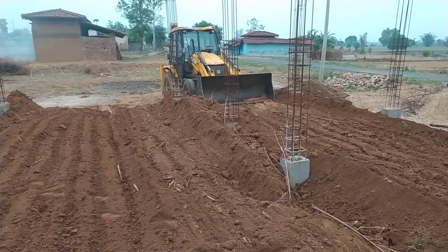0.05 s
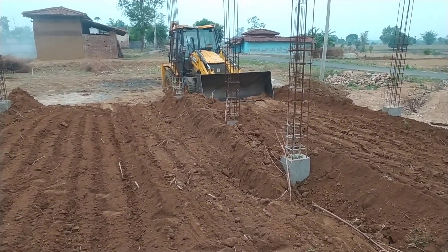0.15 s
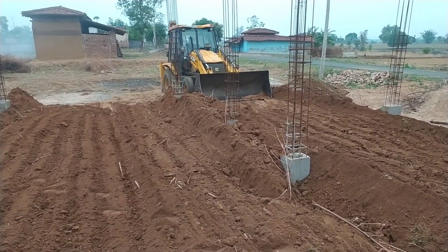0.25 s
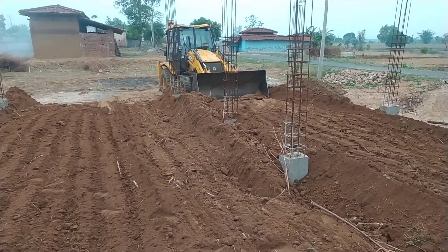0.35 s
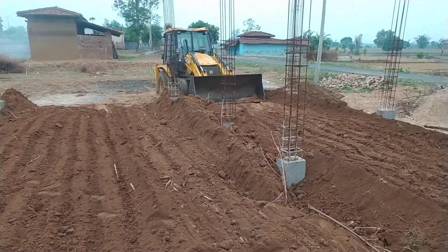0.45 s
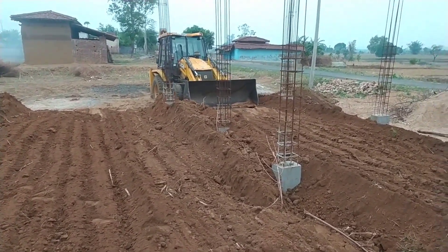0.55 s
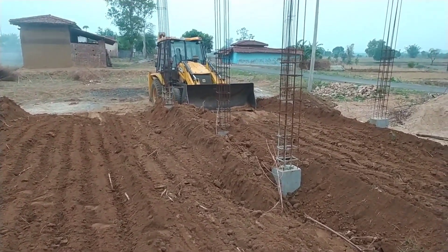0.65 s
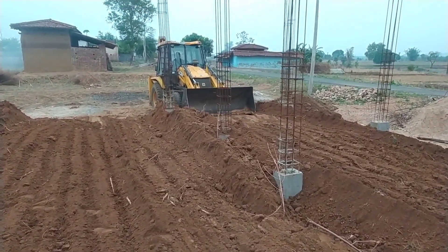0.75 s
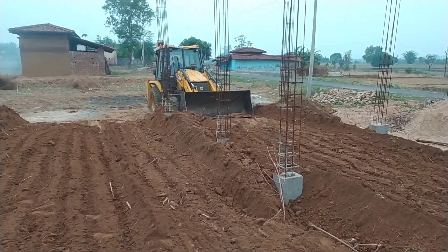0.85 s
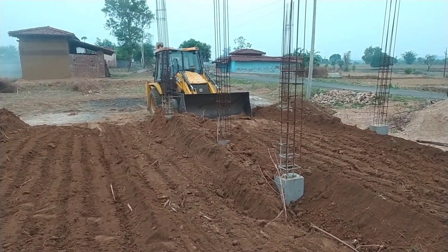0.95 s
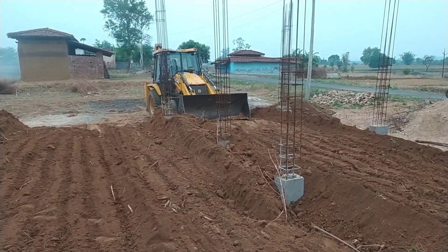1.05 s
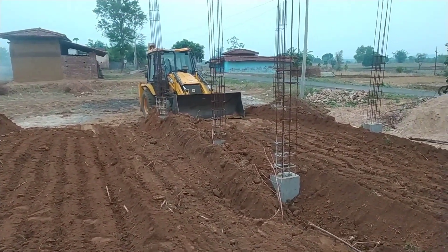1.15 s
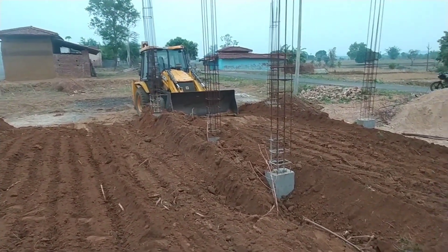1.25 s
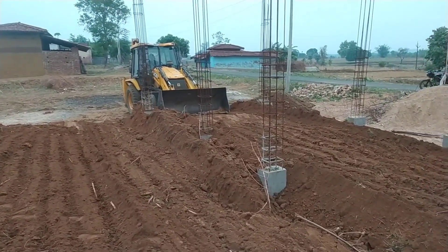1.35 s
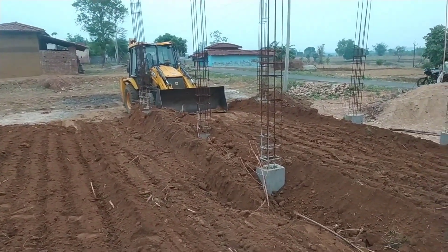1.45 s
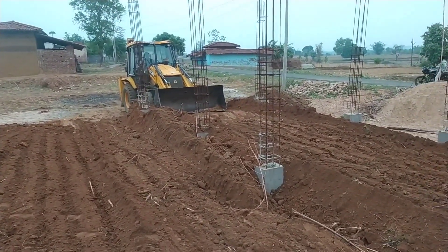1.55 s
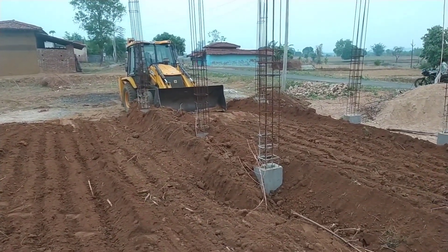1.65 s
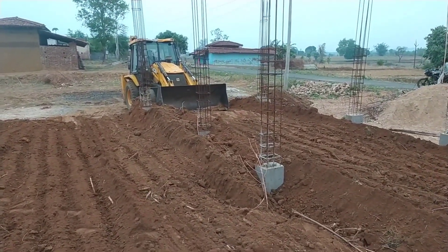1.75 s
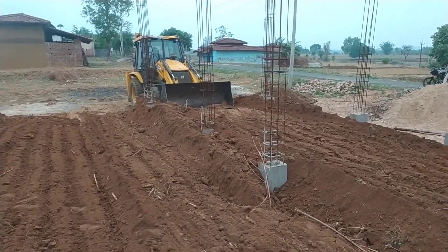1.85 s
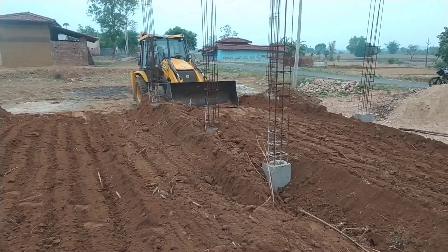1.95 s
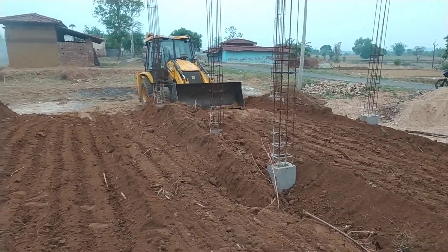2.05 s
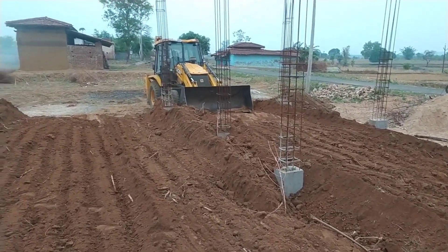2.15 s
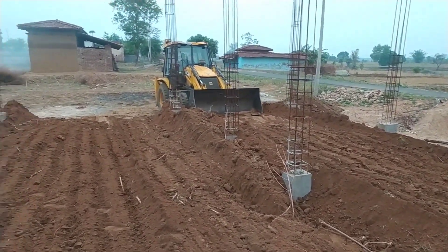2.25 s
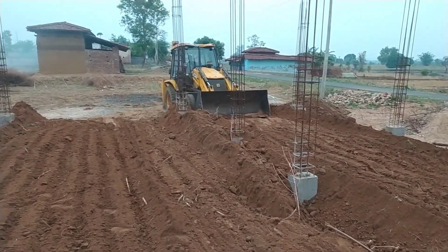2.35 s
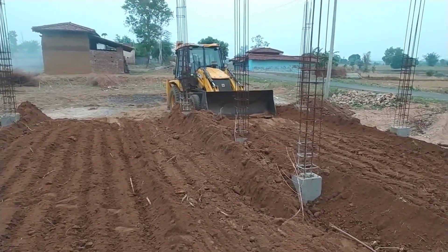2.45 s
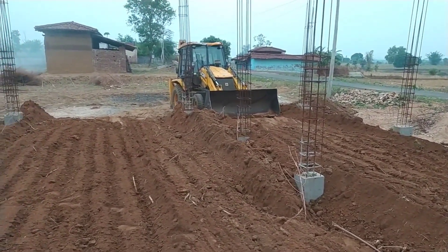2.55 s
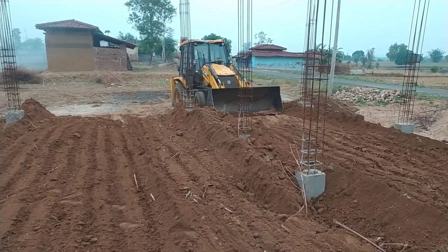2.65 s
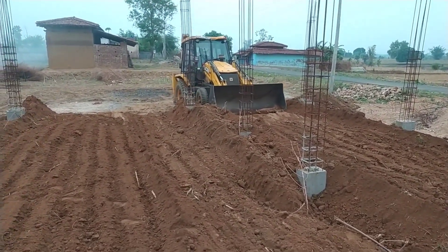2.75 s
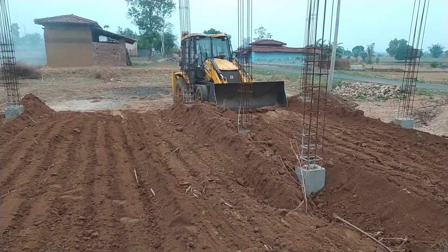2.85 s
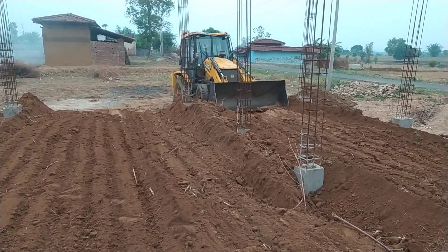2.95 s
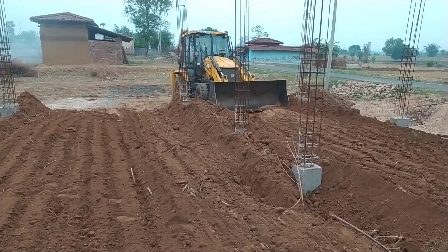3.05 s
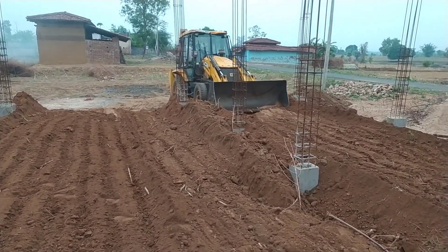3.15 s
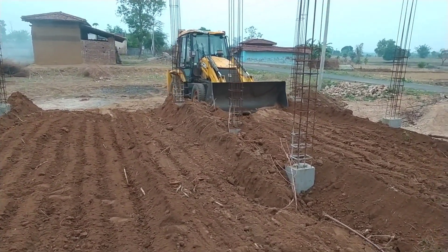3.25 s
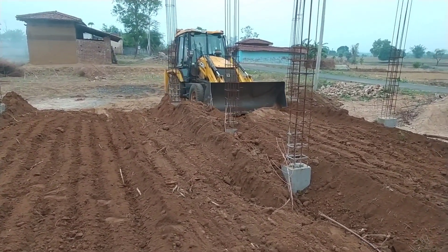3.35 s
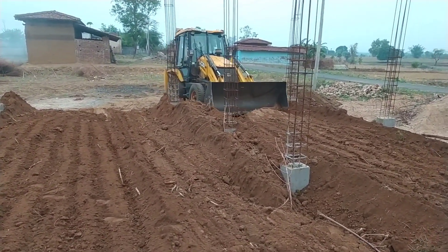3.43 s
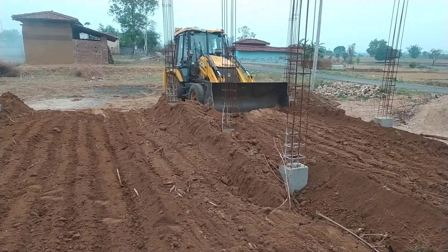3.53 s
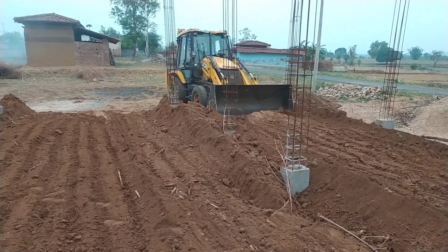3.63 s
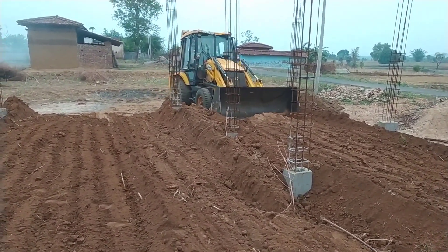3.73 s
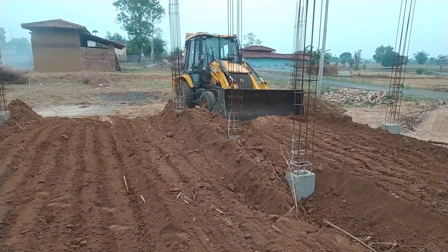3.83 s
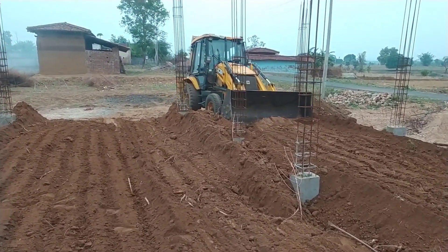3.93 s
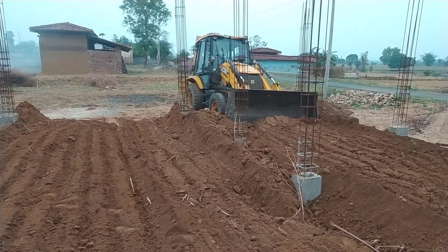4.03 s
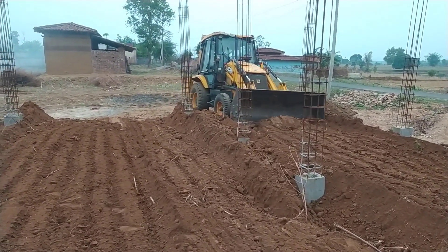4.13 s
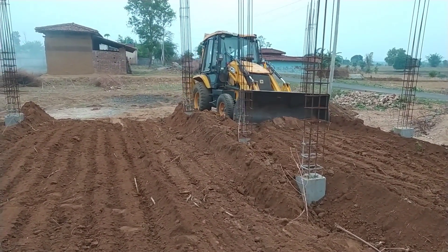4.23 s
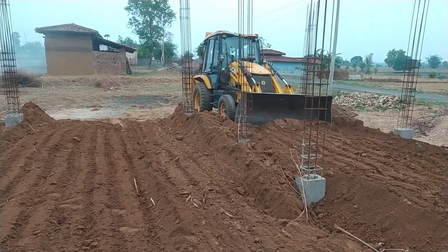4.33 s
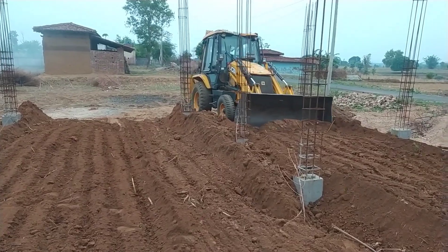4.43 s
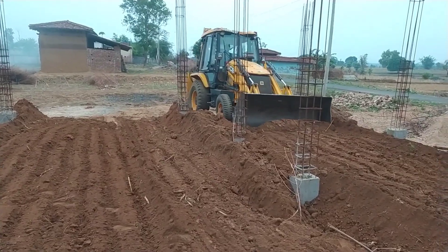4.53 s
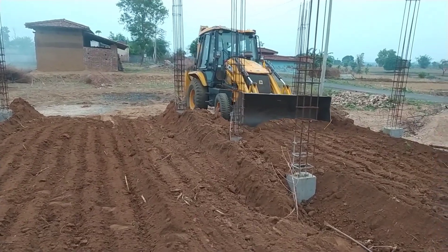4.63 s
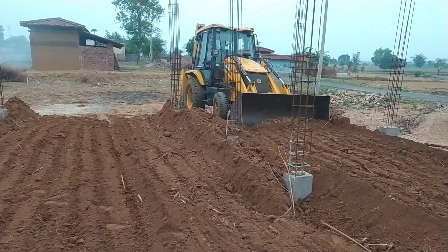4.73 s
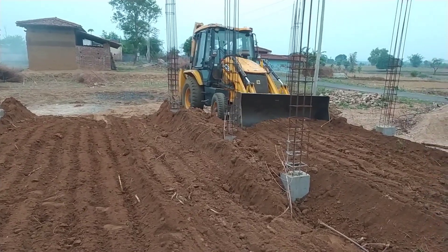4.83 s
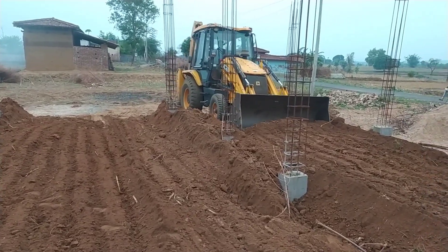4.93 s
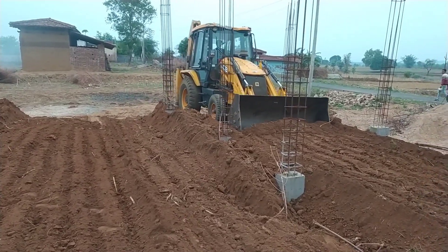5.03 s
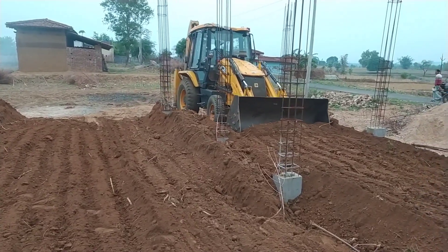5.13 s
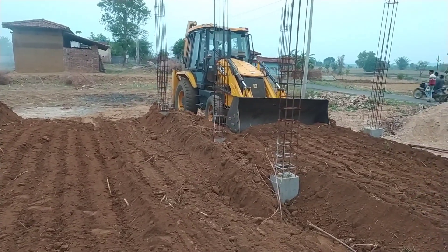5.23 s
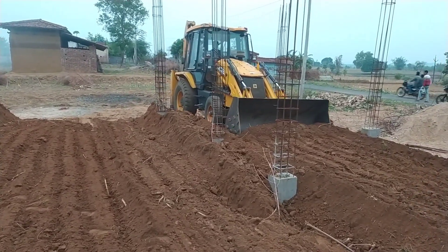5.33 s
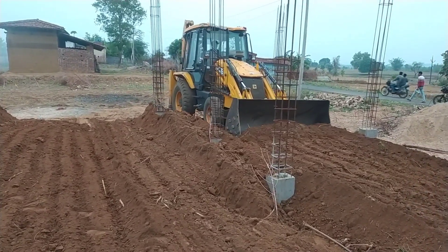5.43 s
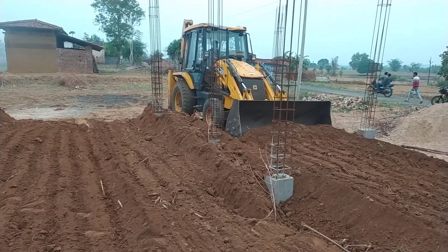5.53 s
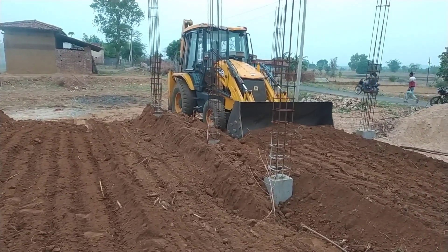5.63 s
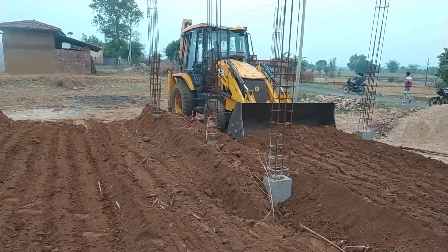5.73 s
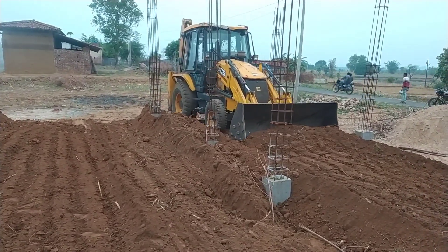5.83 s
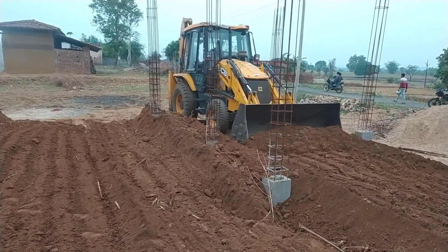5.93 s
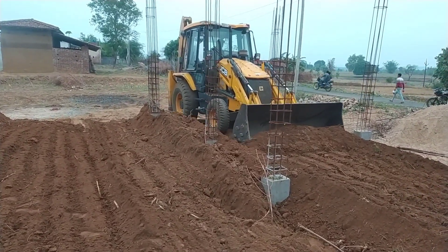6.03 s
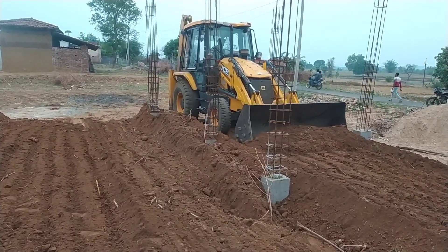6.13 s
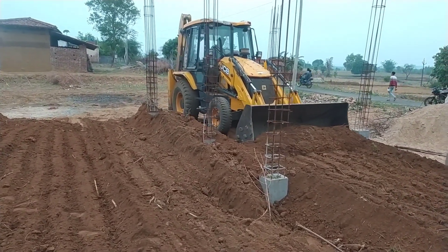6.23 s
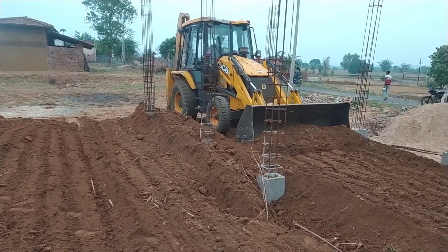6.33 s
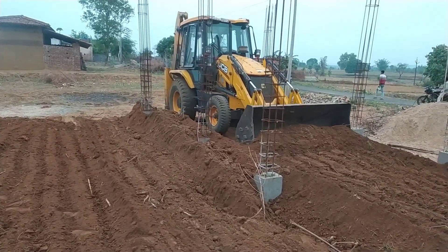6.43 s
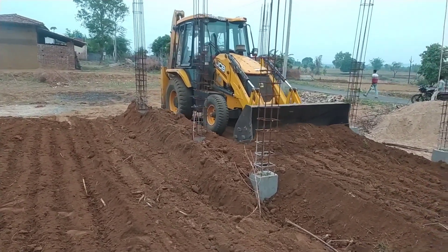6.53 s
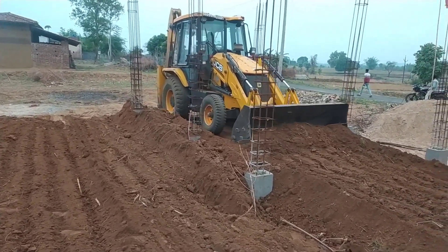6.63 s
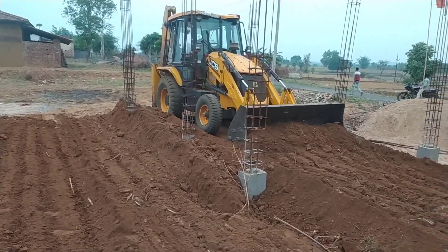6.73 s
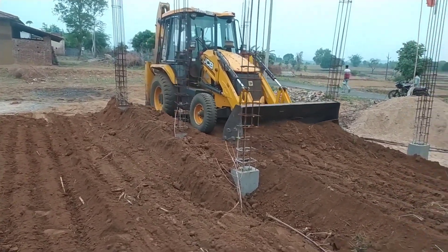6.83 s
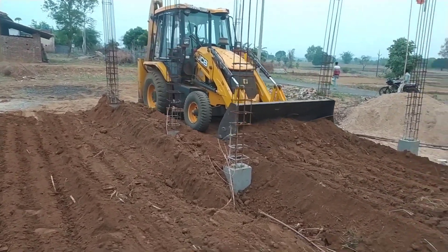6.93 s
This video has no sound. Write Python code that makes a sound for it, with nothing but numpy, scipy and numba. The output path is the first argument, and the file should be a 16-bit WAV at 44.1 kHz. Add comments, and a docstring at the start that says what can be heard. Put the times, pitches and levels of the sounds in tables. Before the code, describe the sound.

From 0 to 1.8 seconds a four-cylinder diesel loader idles some distance away: a low, rapid throb near 39 pulses per second, with grainy exhaust burble, soft block clatter and a dull fan roar. Small dry ticks occur around 0.3, 1.2 and 1.6 seconds. The pitch sags slightly at 1.25 and 1.8, then surges from 1.85 to 2.4 with a burst of hiss, settling near 55 pulses per second. The fuller, harder drone then holds, growing gradually louder and closer until the end at 7 seconds, with irregular hollow exhaust pops. A short bucket clank falls at 3.3; clustered clanks and thin scraping rattles come between 4.6 and 5.0. The note dips briefly at 5.1 and recovers, with small higher clanks near 5.7 to 5.85. Open outdoor space, small stereo microphone, dominated by the engine.

```python
"""A low engine throb idles, climbs in pitch and grows louder as a four-cylinder diesel loader draws near.
The throb is a sum of multiples of the firing rate; noise puffs and decaying modes ring its exhaust pipe.
The block clatters and the gas hisses as noise swelling once a firing; a bucket ticks, clanks and rattles.
Behind lies the roar of fan, intake and tyres. Two microphone ports share the bass but differ above it."""
import sys
import numpy as np
from scipy import signal
from scipy.fft import rfft, irfft
from scipy.io import wavfile
from scipy.ndimage import uniform_filter1d
from numba import njit

SR = 44100
rng = np.random.default_rng(int(sys.argv[2]) if len(sys.argv) > 2 else 0)


def unload_wav(signal):
    """Save mono or channel-first audio to the path in sys.argv[1] as 16-bit WAV at rate SR, clipped to [-1, 1]."""
    wavfile.write(
        sys.argv[1],
        SR,
        np.round(np.clip(np.atleast_2d(signal).T, -1, 1) * 32767).astype(np.int16),
    )


N = 307818
BIN_HZ = np.arange(N // 2 + 1) * SR / N

# firing rate of the engine: (time [s], rate [Hz])
FIRING_RATE = [(0.0, 39.83), (0.9, 39.55), (1.25, 38.21), (1.7, 38.97), (1.82, 37.36), (1.95, 43.13),
               (2.22, 49.41), (2.42, 55.72), (3.6, 55.39), (4.2, 55.48), (4.5, 54.82), (4.72, 55.52),
               (5.13, 52.47), (5.4, 55.78), (5.8, 57.21), (6.25, 56.85), (6.5, 56.26), (6.98, 56.99)]
# engine effort, peaking as the revs climb and as the bucket bites: (time [s], effort [0-1])
EFFORT = [(0, 0.23), (.55, 0.35), (1.0, 0.17), (1.79, 0.09), (1.87, 0.78), (2.1, 0.43), (2.28, 0.96),
          (2.45, 0.53), (2.7, 0.47), (4.1, 0.4), (4.75, 0.57), (5.1, 0.45), (6.98, 0.31)]
IDLE_HZ, FULL_HZ = 39, 56  # firing rates at idle and at full revs
CLIMB_HZ_PER_S = 25  # a rise in firing rate that counts as a full climb
START_M, SETS_OFF_S, SPEED_M_S = 35.3, 2.35, 3.15  # distance, departure and approach speed

# level laws of the engine's layers: (idle level at the start [dB], added at full revs [dB],
# added at full effort [dB], share of the 1 / distance gain [ratio])
TONE_LEVEL = (-41, 6.5, 4, 1.09)
PUFF_LEVEL = (-36.5, 6.5, 6.5, 1.38)
BRIGHTNESS = (-8.5, 3, 3, 0.05)  # applied to each resonance by its share
KNOCK_LEVEL = (-47, 3, 5, 1.28)
HISS_LEVEL = (-54, 3.5, 17, 1.78)
FAN_LEVEL = (-39.5, 5, 2.5, 1.24)

# harmonics against the firing tone: (time [s], second multiple [dB], third multiple [dB])
HARMONICS = [(0, -0.5, -1.5), (.8, -2, 0), (1.71, -2.5, -0.5), (2.3, -0.5, 0.5), (3.1, -7, -1.5),
             (4.0, -6.5, -2), (4.85, -8, 1), (5.0, -7, -5), (5.3, -7, -1.5), (5.7, -4, -6.5),
             (6.98, -8.5, -6)]
# weaker multiples: (multiple of the firing rate, level against the firing tone [dB], waver [dB])
WEAK_MULTIPLES = [(1.5, -16, 1), (2.5, -26.5, 7), (3.5, -15, 2.5), (4, -10.5, 2), (5, -21.5, 0)]
LEAD_RAD = 1.9  # phase advance at full revs for each multiple above the second

# pipe resonances: (cool centre [Hz], hot centre [Hz], width before a factor of 1.56 per stage [Hz],
# level [dB], share of brightness [0-1], steady flow [0-1], lag at full revs [firings], kick [0-1])
PIPE_MODES = [(426, 444, 87, -1, 0.29, 0.46, -0.1, 0.68), (903, 979.3, 151, -1, 1, 0.74, -0.0108, 0.42),
              (1296, 1278, 250, -6.5, 0.81, 0.9, -0.06, 0.17)]
# how hard the four cylinders ring each resonance, one row a resonance:
# (cylinder 1 [dB], cylinder 2 [dB], cylinder 3 [dB], cylinder 4 [dB])
CYLINDERS_IDLE = [(-2, 3, 0, 2.5), (1, -2, 4.5, -2.5), (2, 0, -1, -1)]
CYLINDERS_FULL = [(1, -2, 4.5, -2.5), (1, 0.5, 3.5, -2), (1.5, -1, 0, -0.5)]
IDLE_LAG, FIRING_JITTER = 0.14, 0.02  # extra lag at idle, and spread of the pipe's timing [firings]
# the hardest puffs, before onset and decay: (time [s], first resonance [dB], second resonance [dB])
HARD_PUFFS = [(0.414, -13.5, -34), (0.564, -15.5, -25), (1.255, -17.5, -32), (1.359, -21, -18.5),
              (1.458, -22, -21), (1.541, -19, -28), (1.666, -22, -21.5), (1.919, -17, -16),
              (2.038, -8.5, -21), (2.053, -38, -12), (2.1, -27, -12.5), (2.142, -8.5, -43),
              (2.224, -5.5, -13), (2.666, -12, -10), (2.879, -7.5, -9), (3.89, -4, -12), (4.087, -25, -7),
              (4.235, -12, -3), (4.307, -12, -6), (4.392, -6, -9), (4.828, -4.5, -3), (5.185, -4, -8),
              (5.244, -17, -8), (5.353, -7.5, -6), (5.425, -7.5, -7), (5.566, -4, -8), (5.658, -7.5, -14),
              (5.672, -9, -3), (5.778, -4.5, -4), (5.849, -5, -5), (5.975, -7.5, -9), (6.198, -5.5, -3),
              (6.336, -4, -10), (6.398, -3.5, -15), (6.464, -5.5, -10), (6.552, -2, -13),
              (6.622, -7.5, -3.5), (6.907, -5, -12)]
# decay of a hard puff: (first resonance t60 [s], second resonance t60 [s])
HARD_PUFF_T60 = [0.045, 0.03]
DROWN_SHARE, DROWN_S = 0.85, 0.02  # share of the gas noise a hard puff replaces, and for how long

# combustion knock spectrum: (frequency [Hz], relative level per Hz [dB])
KNOCK_SPECTRUM = [(1000, -26), (1700, 7.5), (1910, 0), (2200, 5.5), (2770, 2), (2990, 0.5), (4000, -18),
                  (5200, -33), (8800, -120)]
# gas hiss spectrum: (frequency [Hz], relative level per Hz [dB])
HISS_SPECTRUM = [(2120, -47), (3600, 6.5), (4090, -0.5), (4420, 7), (5420, 4), (5940, 7), (7460, 0.5),
                 (9390, -2.5), (15200, -38.5)]
# drive of the block: (cylinder 1 [dB], cylinder 2 [dB], cylinder 3 [dB], cylinder 4 [dB])
BLOCK_DRIVE = (-2, -1, 6, -1)

# bucket levels hold before decay and before the dulling of the top
# ticks and scrapes: (time [s], level [dB], centre [Hz], t60 [s], left minus right [dB], rebound delay [ms])
DRY_TICKS = [(0.2622, -18.5, 2500, 0.01, 11, 0.51), (0.331, -36, 3800, 0.03, 8, 0.26),
             (1.184, -29.5, 1680, 0.09, 0, 0.05), (1.2865, -32, 5600, 0.023, -1, 0.9),
             (1.484, -39, 8000, .02, -2, 0.12), (1.605, -40.5, 8000, 0.086, -1, 0.12),
             (1.638, -40, 5000, 0.022, 10, 0.2), (4.86, -29.5, 1870, 0.31, 0, 0.6)]
REBOUND = 0.55  # amplitude of a rebound against its tick
# clanks of the bucket's plates: (time [s], level [dB], pitch [Hz])
PLATE_CLANKS = [(0.079, -21, 1280), (1.606, -30, 9090), (1.608, -35, 7290), (3.274, -5, 1150),
                (4.612, -11, 1025), (4.672, -7.5, 980), (4.689, -13, 1020), (4.697, -11, 1090),
                (4.859, -11, 1530), (5.686, -14, 2250), (5.704, -16, 3030), (5.845, -14, 2970)]
CLANK_CYCLES = 57  # cycles in the t60 of a clank
# linkage rattles: (time [s], ring level [dB], scrape level [dB], scrape t60 [s], part struck [0 or 1])
LINKAGE_RATTLES = [(4.645, -29, -33, .05, 1), (4.787, -32, -31.5, 0.34, 0), (4.797, -32, -33, 0.089, 0),
                   (4.856, -24, -43, .08, 1), (4.915, -18, -31, 0.095, 1), (4.959, -38, -33, .04, 1)]
# modes of the two linkage parts: (frequency [Hz], level [dB], t60 [s])
LINKAGE_MODES = [
    [(3830, -5, 0.11), (5230, 0, 0.053), (6815, -2, .12), (9680, -10, 0.12)],
    [(5400, -6, 0.05), (8660, -9, 0.11)],
]
SCRAPE_HZ, SCRAPE_PAN_DB = 5900, 3  # centre, and left minus right

# fan, intake and tyre spectrum: (frequency [Hz], relative level per Hz [dB])
ROAR_SPECTRUM = [(22, -25), (45, -8), (90, -8.5), (200, 0), (320, -8), (550, -6.5), (720, -13.5),
                 (1200, -11.5), (2000, -19), (4000, -44)]

# correlation of noise between the two ports: (frequency [Hz], correlation [0-1])
PORT_CORRELATION = [(250, 0.99), (500, 1), (700, 0.5), (1000, 1), (1500, 0.9), (2000, 0.25), (4500, 0.86),
                    (8000, 0), (12000, 0.5)]
# port differences in the bass, where there are none:
# (frequency [Hz], left minus right [dB], left phase lag [rad])
BASS_PORTS = [(200, 0, 0)]
# port differences above it: (frequency [Hz], left minus right [dB], left phase lag [rad])
UPPER_PORTS = [(438, 3.5, -0.14), (700, 3, 1.9), (860, -0.5, 0.37), (1606, 6, 1.3), (2050, -0.5, 4),
               (4940, 0.5, 4.5), (7360, 2.5, 5.5), (9700, -17.5, 6.5), (10800, -14.5, 0.5),
               (14300, -3.5, -10.5)]
TOP_HZ = 15100  # edge of the final low-pass


def undb(db):
    """Level in decibels expressed as an amplitude ratio."""
    return 10 ** (np.asarray(db) / 20)


def unit(x):
    """Normalisation to an rms of 1."""
    return x / np.sqrt(np.mean(x ** 2))


def curves(table):
    """Linear interpolation of a time table's columns at every sample."""
    s, *columns = np.transpose(table)
    return [np.interp(np.arange(N) / SR, s, column) for column in columns]


def along(table):
    """Interpolation of a spectral table's columns over log frequency, at every bin."""
    hz, *columns = np.transpose(table)
    return np.squeeze([np.interp(np.log(BIN_HZ + 1), np.log(hz), column) for column in columns])


def colour(x, table):
    """Zero-phase filtering: the spectrum is multiplied by a gain curve in dB."""
    return irfft(rfft(x) * undb(along(table)), N)


def pair():
    """Partial correlation: shared and independent white noise are mixed band by band for two ports."""
    first, other = rfft(rng.standard_normal((2, N)))
    c = np.clip(along(PORT_CORRELATION), 0, 1)
    return irfft(np.array([first, c * first + np.sqrt(1 - c ** 2) * other]), N)


@njit
def svf(x, hz, width):
    """Resonance of a state-variable band-pass with a moving centre, applied to each row."""
    y = np.empty_like(x)
    for row in range(len(x)):
        band, low = 0., 0.
        for i in range(x.shape[1]):
            g = np.tan(np.pi * hz[i] / SR)
            damping = width / hz[i]
            v = (band + g * (x[row, i] - low)) / (1 + g * (g + damping))
            band = 2 * v - band
            low += 2 * g * v
            y[row, i] = damping * v
    return y


def walk(rate):
    """Random modulation: normal values held for 1 / rate seconds, smoothed, with an rms of 1 overall."""
    hold = int(SR / rate)
    steps = np.repeat(rng.standard_normal(N // hold + 1), hold)
    return unit(uniform_filter1d(steps, hold)[:N])


def puffs(turns, lag, fall, steady, scatter_db, pattern_db=0, smooth_s=0.019, kick=0):
    """Pulsating turbulence: noise swells at each firing and decays; an impulse may start each pulse."""
    cycle, phase = np.divmod(turns - lag + 1, 1)
    cycle = cycle.astype(int)
    # every firing has its own size
    size = undb(pattern_db + scatter_db * rng.standard_normal(N // 500)[cycle])
    swell = steady + uniform_filter1d(size * np.exp(-phase / fall), int(smooth_s * SR))
    starts = np.diff(cycle, prepend=cycle[0]) > 0
    kicks = kick * size * starts / np.sqrt(np.abs(np.gradient(turns)))
    # dividing by the half-second rms leaves only the quick swelling
    return pair() * swell / np.sqrt(uniform_filter1d(swell ** 2, SR // 2)) + kicks


def add(out, s, sound):
    """Superposition of a short sound from s seconds on."""
    i = int(s * SR)
    out[:, i:i + sound.shape[-1]] += sound[..., :N - i]


def ring(hz, t60, rise_s=0.0036):
    """Free vibration of one mode: a sine with a soft onset and exponential decay."""
    t = np.arange(int((t60 + rise_s) * SR)) / SR
    return np.sin(2 * np.pi * hz * t) * (1 - np.exp(-t / rise_s)) * undb(-60 * t / t60)


def burst(db, hz, t60, pan_db):
    """Impact noise: a wide band of partly shared noise decays exponentially, cut off at a quarter second."""
    t = np.arange(int(.25 * SR)) / SR
    noise = rng.standard_normal(len(t)) + 1.7 * rng.standard_normal((2, len(t)))
    centre = np.full(len(t), 1. * hz)
    band = unit(svf(svf(noise, centre, 1.7 * hz), centre, 1.7 * hz))
    envelope = (1 - np.exp(-t / .0004)) * undb(-60 * t / t60)
    return band * envelope * undb(db + np.array([[pan_db], [-pan_db]]) / 2)


def throb(turns, revs, tone_db):
    """Fourier synthesis: a train of suction pulses as multiples of the firing rate, wavering a little."""
    def lead(multiple):
        """Phase advance growing with revs and with the order of the multiple."""
        return LEAD_RAD * revs * max(multiple - 2, 0)

    out = np.zeros(N)
    levels_db = [tone_db] + [tone_db + db for db in curves(HARMONICS)]
    for k, db in enumerate(levels_db, start=1):
        tone = np.cos(2 * np.pi * k * turns + lead(k))
        out += (-1) ** (k - 1) * undb(db + .3 * walk(9)) * tone
    for k, db, waver_db in WEAK_MULTIPLES:
        gain = undb(tone_db + db + waver_db * walk(12))
        # the phase wavers along with the level, by an independent walk
        out += gain * np.sin(2 * np.pi * k * turns + lead(k) + waver_db / 4 * walk(8.7))
    return np.sqrt(2) * out  # peak amplitude for the stated rms


def exhaust(turns, revs, heat, puff_db, bright_db):
    """Pipe resonance: turbulent puffs excite modes whose centres shift as the gas grows hotter."""
    out, hard, drowned = np.zeros((2, N)), np.zeros((2, N)), np.zeros((1, N))
    centres = [cool_hz + (hot_hz - cool_hz) * heat for cool_hz, hot_hz, *_ in PIPE_MODES]
    for hz, mode, idle_db, full_db in zip(centres, PIPE_MODES, CYLINDERS_IDLE, CYLINDERS_FULL):
        *_, width, db, bright, steady, lag, kick = mode
        lag = lag + IDLE_LAG * (1 - revs)
        cylinder = np.floor(turns - lag + 1).astype(int) % 4
        pattern_db = (1 - revs) * np.take(idle_db, cylinder) + revs * np.take(full_db, cylinder)
        gas = puffs(turns, lag + FIRING_JITTER * walk(30), fall=.27, steady=steady, scatter_db=1.0,
                    pattern_db=pattern_db, smooth_s=.004, kick=kick)
        for _ in range(3):
            gas = svf(gas, hz, 1.56 * width)
        out += unit(gas) * undb(db + puff_db + bright * bright_db)
    for s, *levels_db in HARD_PUFFS:
        add(drowned, s - .004, signal.windows.tukey(int(DROWN_S * SR), .6))
        for hz, db, t60 in zip(centres, levels_db, HARD_PUFF_T60):
            add(hard, s, undb(db) * ring(hz[int(s * SR)], t60))
    return out * (1 - DROWN_SHARE * np.minimum(drowned, 1)) + hard


def clatter(turns, effort, climb, knock_db, hiss_db):
    """Structure-borne knock and jet noise: combustion drives the block, gas hisses at the pipe's end."""
    effort = np.clip(effort, 0, 1)
    # valve gear makes the noise gritty, with a new level every few milliseconds
    grit = undb(1.3 * walk(350))
    knock = grit * puffs(turns, lag=.02, fall=.35, steady=.8, scatter_db=2.0)
    knock = unit(colour(knock, KNOCK_SPECTRUM))
    # hard strokes ring the block, one cylinder most of all
    cylinder = np.floor(turns + 1).astype(int) % 4
    block = puffs(turns, lag=0, fall=.3, steady=.25, scatter_db=3,
                  pattern_db=np.take(BLOCK_DRIVE, cylinder), smooth_s=.003)
    knock += (0.79 * effort + 0.32 * climb) * unit(svf(block, np.full(N, 2980.), 133.0))
    # effort and climbing revs thin the steady flow, leaving the pulses
    soft_flow = (.9 - .55 * effort) * (1 - .15 * climb)
    soft = unit(grit) * puffs(turns, lag=.06, fall=.3, steady=soft_flow, scatter_db=2.2, smooth_s=.005)
    sharp_flow = .6 * (1 - climb) * (1 - effort) ** 2
    sharp = puffs(turns, lag=.04, fall=.2, steady=sharp_flow, scatter_db=2.2, smooth_s=.006)
    sharp *= undb(1.1 * walk(9))  # the top of the hiss flickers
    # soft pulses fill the lower hiss, sharp ones the top
    hiss = colour(soft, [(6500, -1.3), (8000, 0.85)]) + colour(sharp, [(6500, -29.0), (8000, 4)])
    hiss = unit(colour(hiss, HISS_SPECTRUM))
    return knock * undb(knock_db) + hiss * undb(hiss_db)


def bucket():
    """Impact and modal decay: ticks are noise bursts, clanks single modes, rattles scrape and ring."""
    out = np.zeros((2, N))
    for s, *tick, rebound_ms in DRY_TICKS:
        sound = burst(*tick)
        add(out, s, sound)
        add(out, s + rebound_ms / 1000, REBOUND * sound)
    for s, db, hz in PLATE_CLANKS:
        add(out, s, undb(db) * ring(hz, CLANK_CYCLES / hz, rise_s=0.0022))
    for s, ring_db, scrape_db, scrape_t60, part in LINKAGE_RATTLES:
        add(out, s, burst(scrape_db, SCRAPE_HZ, scrape_t60, SCRAPE_PAN_DB))
        for hz, db, t60 in LINKAGE_MODES[int(part > .5)]:
            add(out, s, undb(ring_db + db) * ring(hz, t60, rise_s=0.0024))
    # air and microphone dull the very top; everything below falls by 1.5 dB
    return colour(out, [(9800, -1.5), (12500, -14)])


def fan(turns, hz, db):
    """Broadband flow noise: fan, intake and tyres roar, beating faintly, under a blurred blade note."""
    roar = puffs(turns, lag=-0.58, fall=1.0, steady=1.0, scatter_db=6.0)
    roar = unit(colour(roar, ROAR_SPECTRUM))
    blade_hz = 4.89 * hz
    blades = unit(svf(svf(pair(), blade_hz, 43.0), blade_hz, 43.0))
    # the note stands out most at idle
    return undb(db) * (roar + blades * undb(-3 - .2 * (hz - 39)))


def scene():
    """Superposition of sources; revs, effort and the inverse distance law set the engine's levels."""
    (hz,), (effort,) = curves(FIRING_RATE), curves(EFFORT)
    revs = np.clip((hz - IDLE_HZ) / (FULL_HZ - IDLE_HZ), 0, 1)
    rise_hz_per_s = uniform_filter1d(np.gradient(hz) * SR, SR // 20)
    climb = np.clip(rise_hz_per_s / CLIMB_HZ_PER_S, 0, 1)
    metres = START_M - SPEED_M_S * np.maximum(np.arange(N) / SR - SETS_OFF_S, 0)
    near_db = 20 * np.log10(START_M / metres)

    def level(law):
        """Sum of a law's terms in decibels."""
        idle_db, revs_db, effort_db, near_share = law
        return idle_db + revs_db * revs + effort_db * effort + near_share * near_db

    heat = 0.93 * np.sqrt(revs) + 0.35 * effort + 0.0088 * near_db
    turns = np.cumsum(hz) / SR - .03  # one turn a firing
    # at idle the bursts come later in the cycle
    bursts = turns - 0.1307 * np.clip((50 - hz) / 11, 0, 1)
    engine = throb(turns, revs, level(TONE_LEVEL))
    engine = engine + exhaust(bursts, revs, heat, level(PUFF_LEVEL), level(BRIGHTNESS))
    engine += clatter(bursts, effort, climb, level(KNOCK_LEVEL), level(HISS_LEVEL))
    return engine + bucket() + fan(bursts, hz, level(FAN_LEVEL))


def record(dry):
    """Two-port reception: level and phase differ between the ports above the bass; a low-pass cuts the top."""
    balance_db, lag = along(BASS_PORTS + UPPER_PORTS)
    half = undb(balance_db / 2)
    wet = irfft(rfft(dry) * np.array([half * np.exp(-1j * lag), 1 / half]), N)
    return signal.sosfilt(signal.ellip(8, .2, 70, TOP_HZ, fs=SR, output="sos"), wet)


dry = scene()
out = record(dry)
unload_wav(out)
```